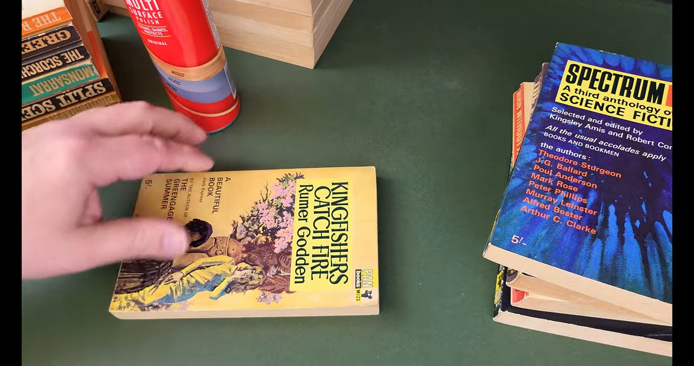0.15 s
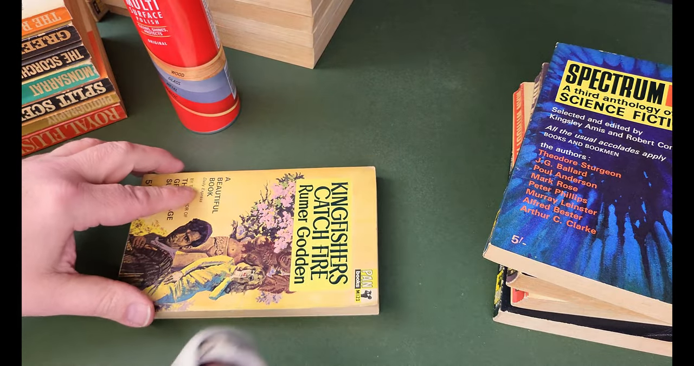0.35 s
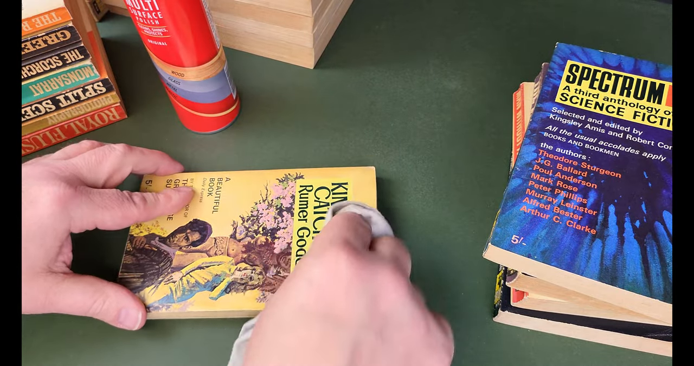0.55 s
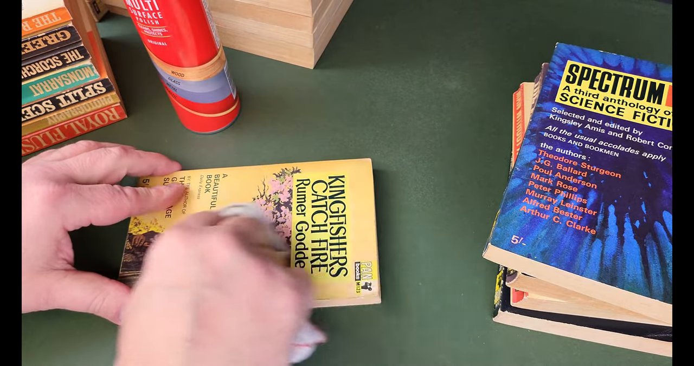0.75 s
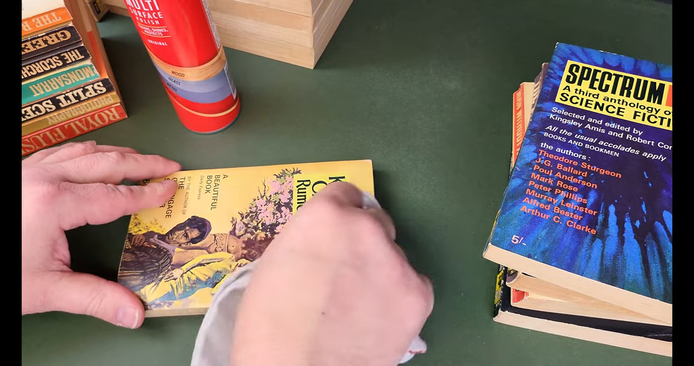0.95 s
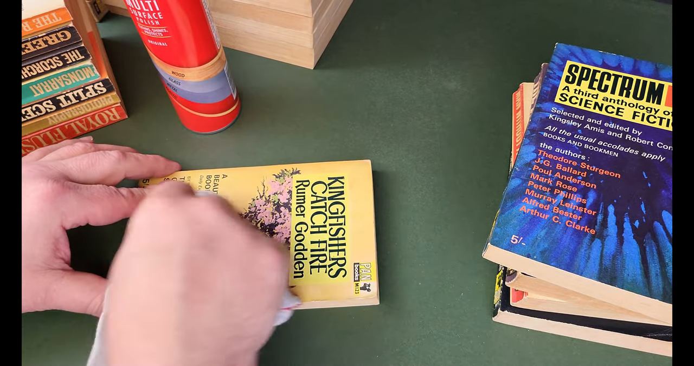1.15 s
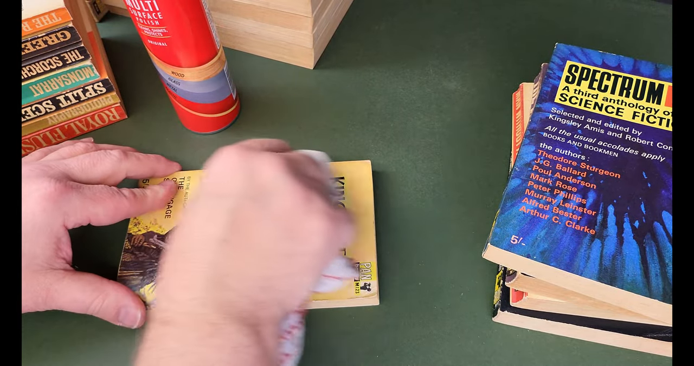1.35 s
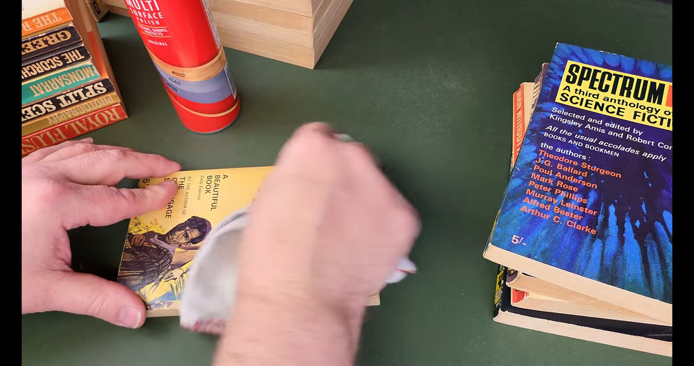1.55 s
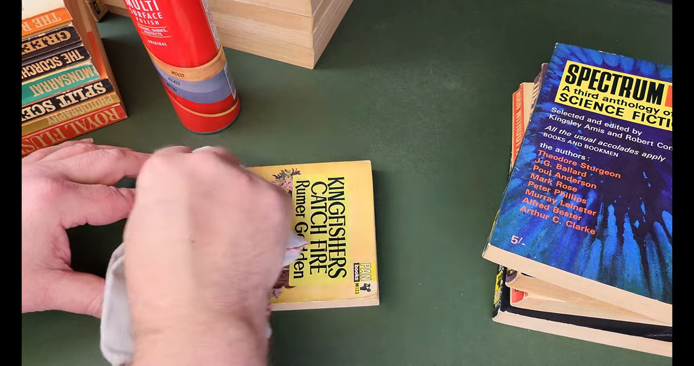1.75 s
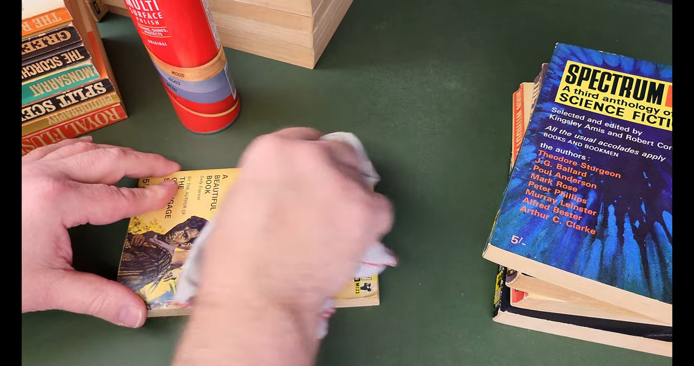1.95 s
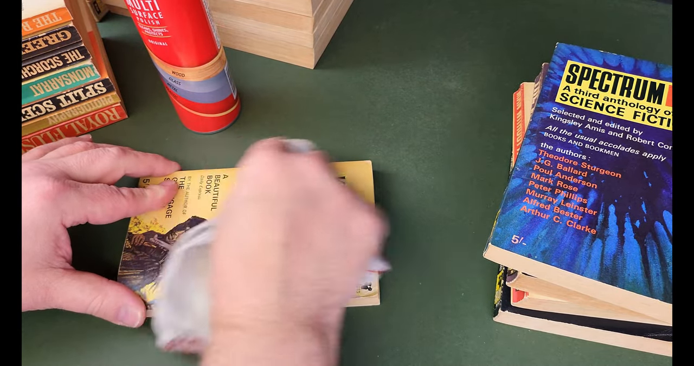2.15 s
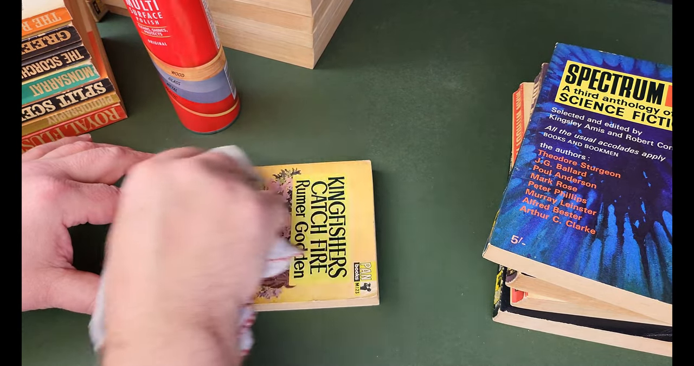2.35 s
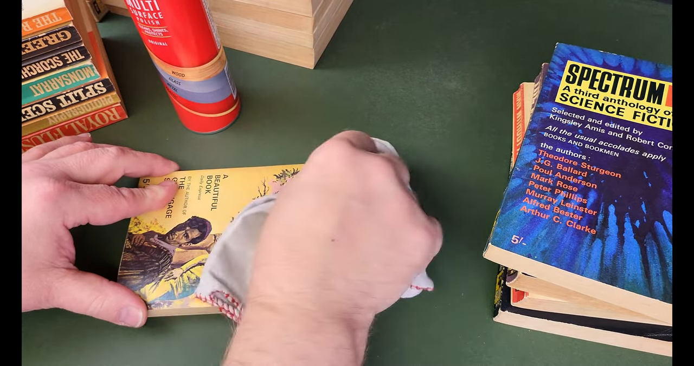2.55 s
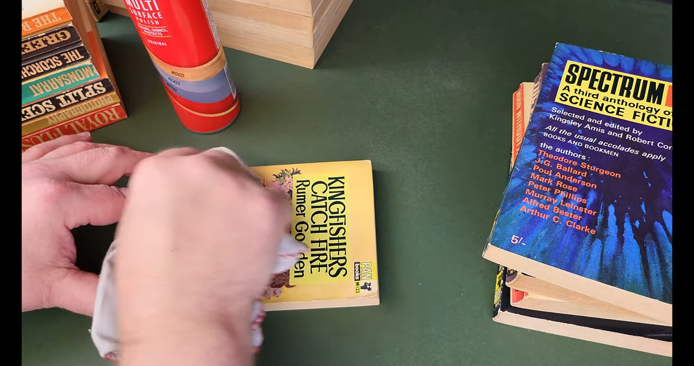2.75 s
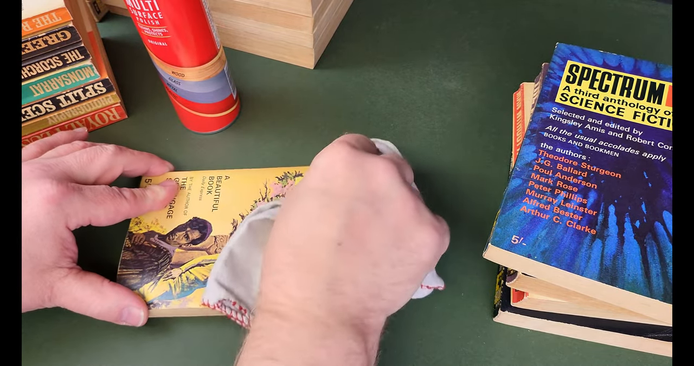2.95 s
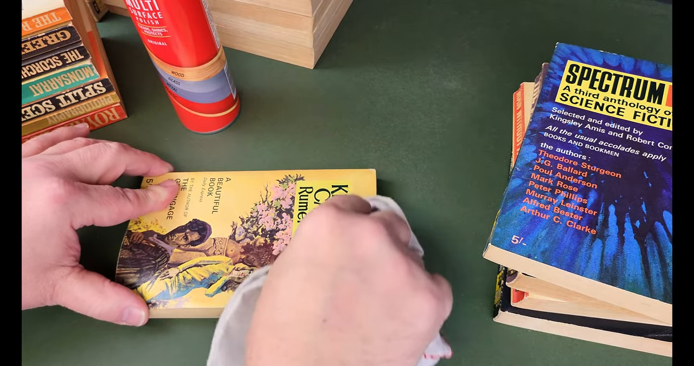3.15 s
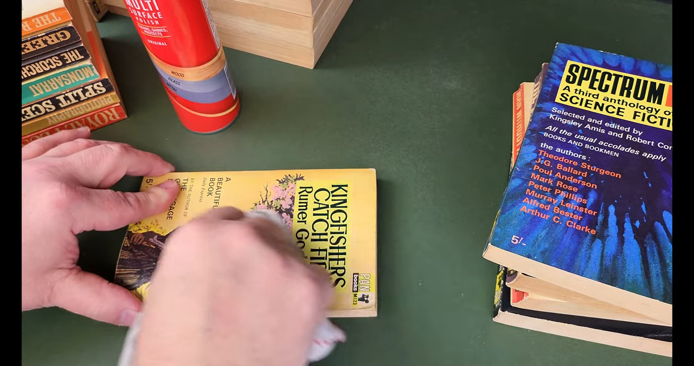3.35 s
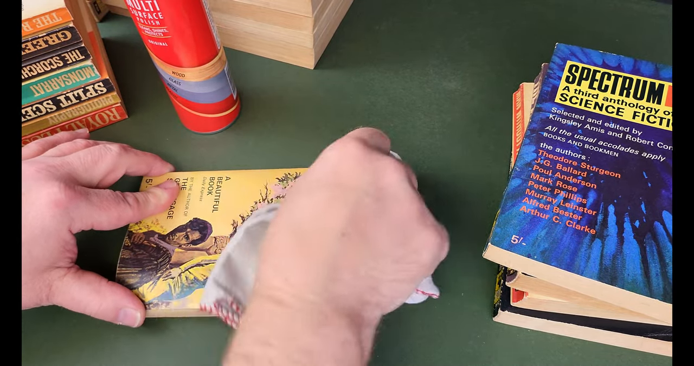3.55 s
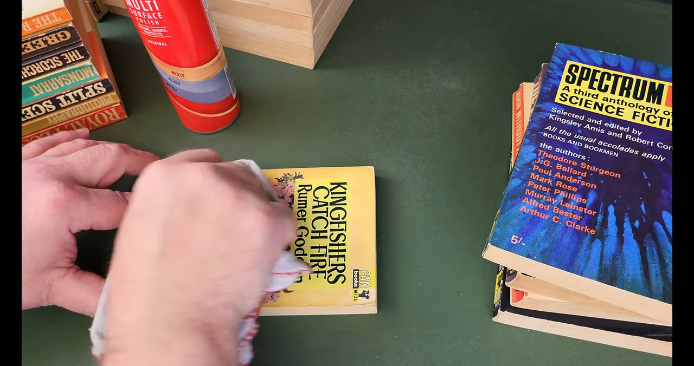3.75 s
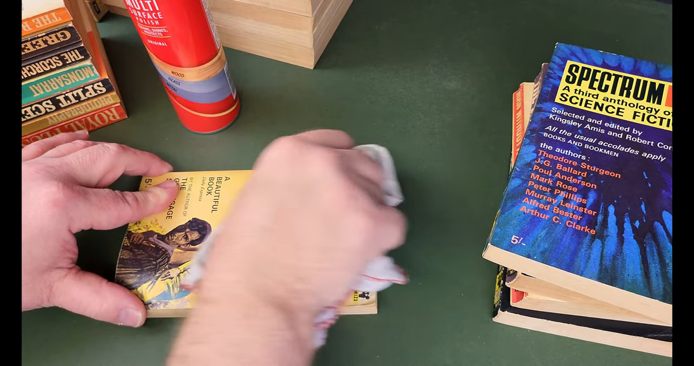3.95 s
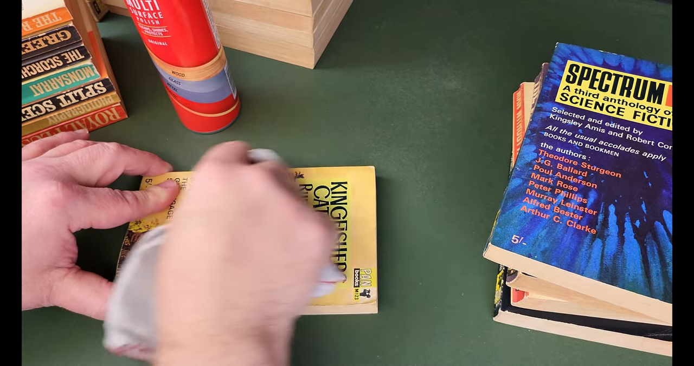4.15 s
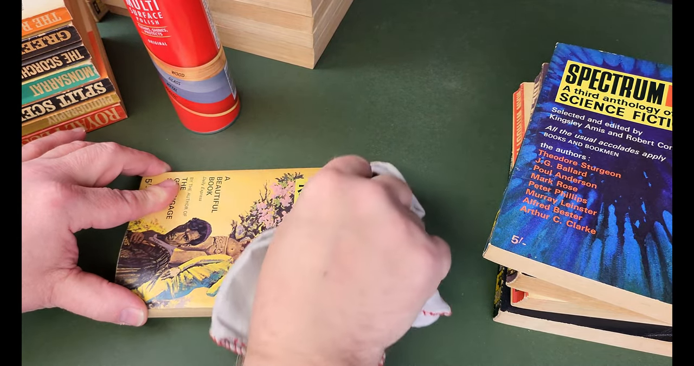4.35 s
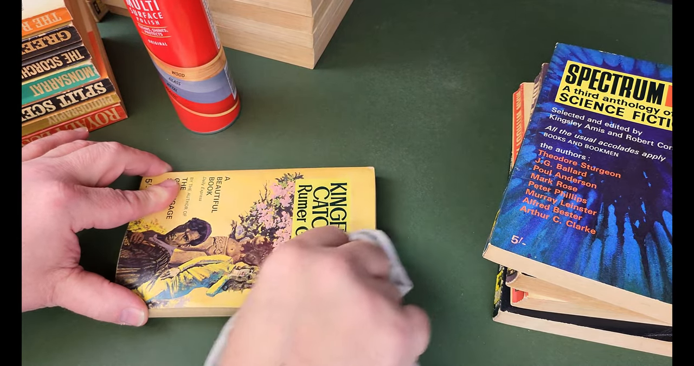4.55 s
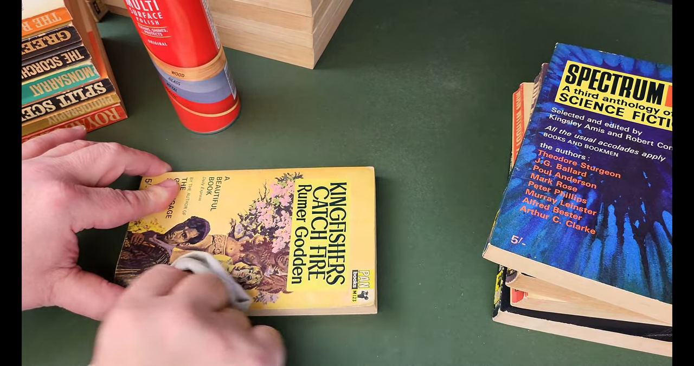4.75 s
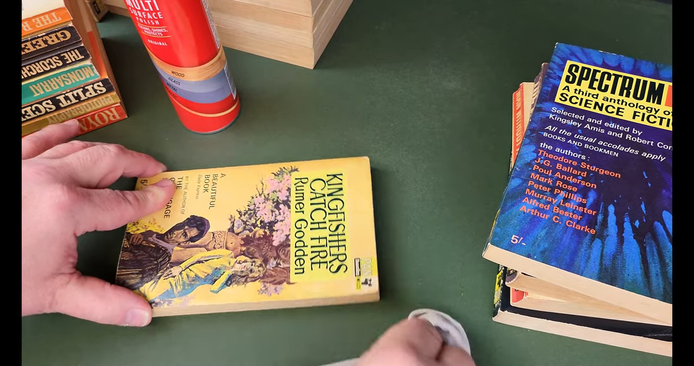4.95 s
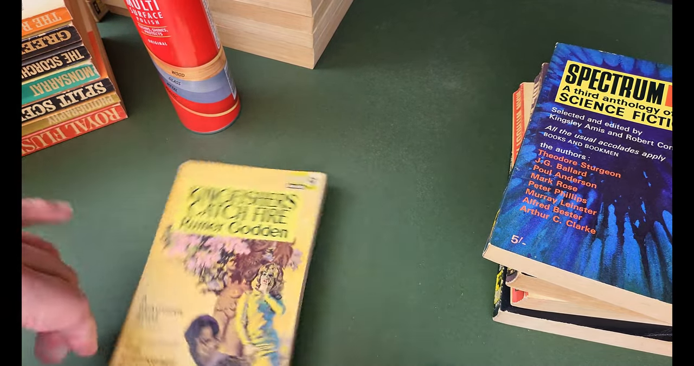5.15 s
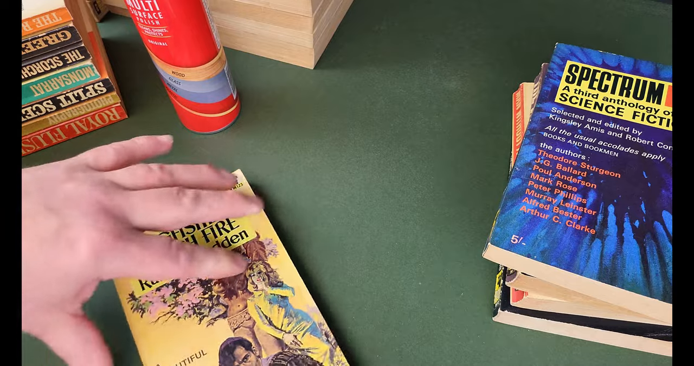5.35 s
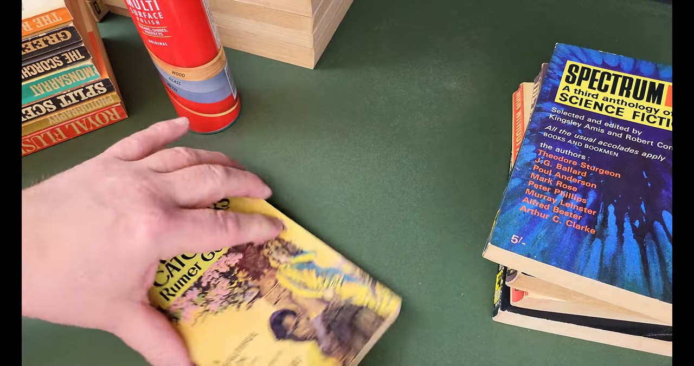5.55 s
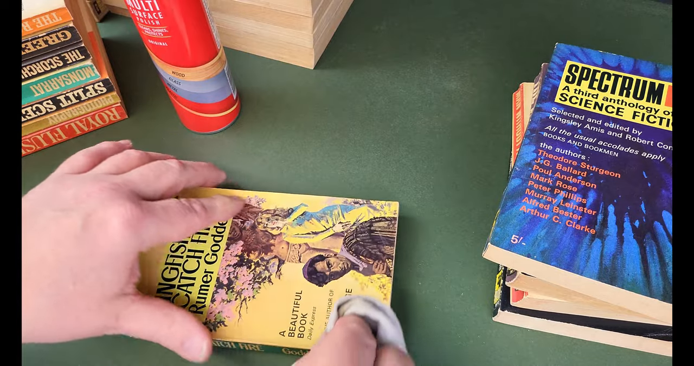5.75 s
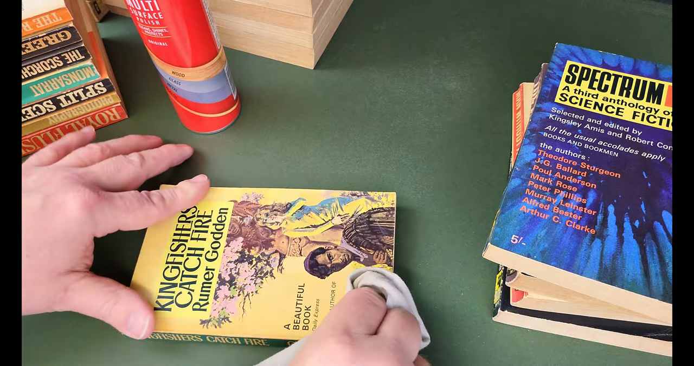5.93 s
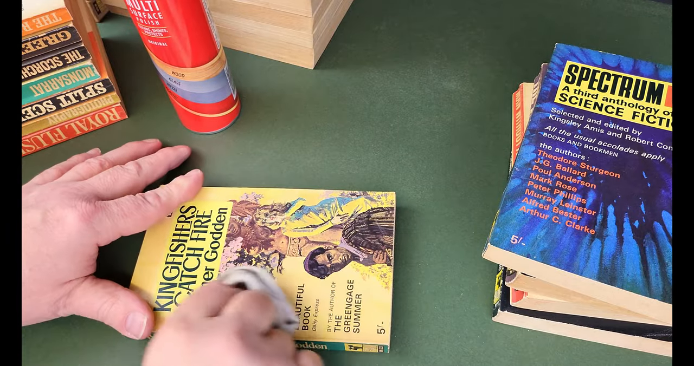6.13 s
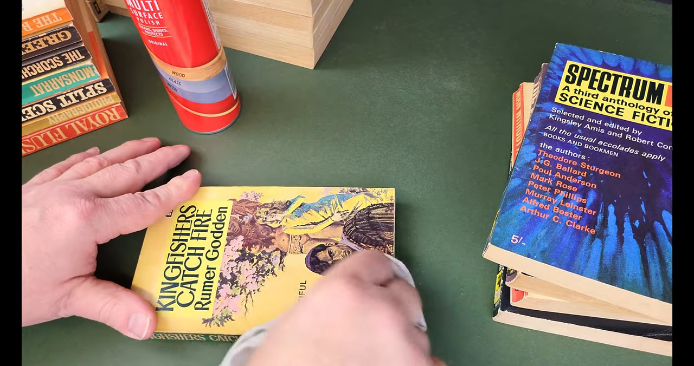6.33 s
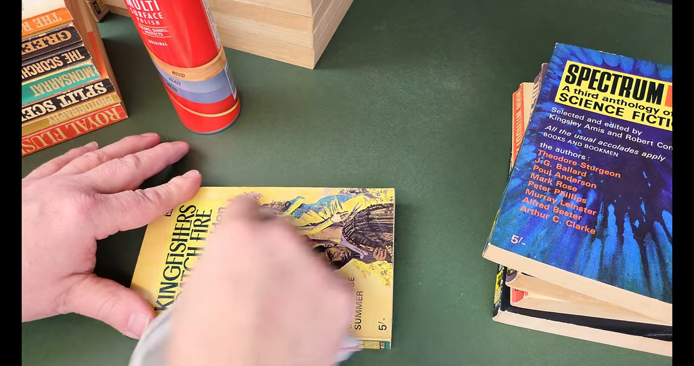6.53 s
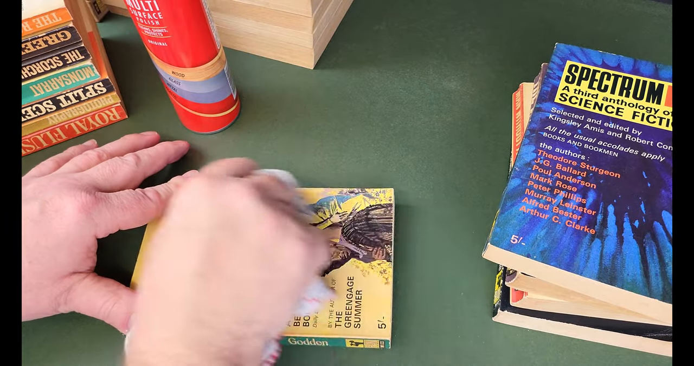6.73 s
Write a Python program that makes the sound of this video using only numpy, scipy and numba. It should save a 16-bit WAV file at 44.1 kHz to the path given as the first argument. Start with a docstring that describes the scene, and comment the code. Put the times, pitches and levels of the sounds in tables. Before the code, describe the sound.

A paperback drops onto a wooden table, then a cloth rubs its glossy cover in brisk, hissing strokes with a few handling knocks.

```python
"""Wiping down a paperback

A paperback drops flat on a wooden table, is held down and wiped with a cloth in brisk strokes, then
turned round and wiped again. Fibres slip over the glossy cover as a grainy hiss, the pressing hand
shakes the table, and knocks ring it. The microphone is close and overloads on the drop."""
import sys
import numpy as np
from scipy import signal
from scipy.fft import rfft, irfft
from scipy.io import wavfile
from scipy.ndimage import uniform_filter1d
from numba import njit

SR = 44100
rng = np.random.default_rng(int(sys.argv[2]) if len(sys.argv) > 2 else 0)


def master(y):
    """Save y as 16-bit WAV."""
    cut = np.clip(np.atleast_2d(y).T, -1, 1)
    pcm = np.round(cut * 32767)  # scale
    wavfile.write(sys.argv[1], SR, pcm.astype(np.int16))


N = 299439


def undb(db):
    """dB to gain."""
    return 10 ** (np.asarray(db) / 20)


def unit(x):
    """Scale to rms 1."""
    return x / np.sqrt(np.mean(x ** 2))


def wander(per_s):
    """Smooth random modulation: stepped levels, slewed twice."""
    hold = int(SR / per_s)
    steps = np.repeat(rng.standard_normal(N // hold + 1), hold)
    return unit(uniform_filter1d(uniform_filter1d(steps, hold), hold)[:N])


def band(x, hz, width):
    """Fixed band-pass around hz."""
    sos = signal.butter(2, [hz - width / 2, hz + width / 2], "band", fs=SR, output="sos")
    return signal.sosfilt(sos, x)


def ring(force, modes):
    """A force sets damped modes ringing; below 150 Hz they push little air."""
    out = np.zeros(N)
    for hz, db, t60 in modes:
        pole = np.exp(2j * np.pi * hz / SR - np.log(1000) / (t60 * SR))
        out += undb(db) * signal.lfilter([1], [1, -pole], force).imag
    return signal.lfilter(*signal.butter(2, 150, "high", fs=SR), out)


def slips(per_s, scatter_db):
    """Stick-slip: single jerks at random moments, a few much larger than the rest."""
    when, jerk, size = rng.random(N) < per_s / SR, rng.standard_normal(N), rng.exponential(size=N)
    return unit(when * jerk * undb(scatter_db * size))


def cue_grid(table):
    """A millisecond timeline, and the table's columns shaped to give one envelope per cue."""
    return np.arange(0, N / SR + .002, .001), np.transpose(table)[:, :, None]


def to_samples(t, envelope):
    """Smooth a millisecond envelope and bring it to audio rate."""
    return np.interp(np.arange(N) / SR, t, uniform_filter1d(envelope, size=5))


def fade_db(t, start, length, rise_db_per_s, fall_db_per_s):
    """Attenuation before and after a move; one that starts just after a knock has a hard attack."""
    since_knock = start - np.transpose(KNOCKS)[0]
    lands = ((since_knock > 0) & (since_knock < .014)).any(axis=1, keepdims=True)
    rise = np.where(lands, 3000, rise_db_per_s)
    return rise * np.maximum(start - t, 0) + fall_db_per_s * np.maximum(t - start - length, 0)


# EQ curve of the room tone: f/Hz, relative level/dB
ROOM_EQ = [(18, -31.5), (30, -9), (59, 0.5), (243, -2), (341, -7.5), (519, -7.5), (768, -17.5), (1560, -24),
           (3070, -29), (3990, -19), (5180, -18.5), (6560, -34), (15500, -33)]


def room():
    """A quiet bed of room tone that swells a little."""
    hz, db = np.transpose(ROOM_EQ)
    f = np.maximum(np.arange(N // 2 + 1) * SR / N, 1)
    eq = undb(np.interp(np.log(f), np.log(hz), db))
    tone = irfft(rfft(rng.standard_normal(N)) * eq, N)
    return unit(tone) * undb(-65.5 + 2.1 * wander(2.7))


# Fibres or grit catching on the table top: t/s, level/dB
TICKS = [(5.13, -21), (5.1476, -20), (5.1644, -26), (5.234, -21), (5.2554, -24), (5.2849, -15)]


def ticks():
    """Tiny bright catches as the book turns on the table."""
    force = np.zeros(N)
    for s, db in TICKS:
        force[int(s * SR)] = undb(db)
    return undb(4) * band(force, hz=5700, width=7400)


# Wooden body of the table with the book on it, also rung by the knocks: f/Hz, level/dB, t60/s
TABLE_MODES = [(45.2, -14.5, 0.067), (67, -14, 0.16), (96, -9, 0.11), (111, -10.5, 0.19), (129.4, -9, 0.22),
               (161, -16, 0.11), (199.6, -11.5, 0.14), (238.5, -1.5, 0.16), (277, -8.5, 0.09),
               (324, -3.5, 0.083), (354.3, 3.5, 0.087), (407.2, -3, 0.12), (450, -10, 0.12),
               (505, -0.5, 0.081), (559, -9.5, 0.057), (638, -14, 0.082), (689, -6.5, 0.062),
               (777, -9.5, 0.05), (940, -14.5, 0.064), (1160, -22, 0.055), (1483, -17.5, .05)]
# Shoves of the hand through the book: t/s, hold/s, low level/dB, upper level/dB, low fade/(dB/s)
SHOVES = [ (0.0, 0.0056, -63, -63, 348), (0.052, 0.0067, -64, -39, 258), (0.105, 0.12, -50.5, -54, 97),
          (0.131, 0.023, -55, -51, 202), (0.2, .04, -36, -36, 220), (0.46, 0.016, -67, -63.5, 500),
          (0.685, .02, -56, -56, 100), (0.885, 0.047, -60, -61.5, 150), (1.115, .01, -58.5, -70, 198),
          (1.215, 0.058, -48, -57.5, 166), (1.42, 0.017, -60, -69, 180), (1.59, 0.033, -56, -64, 199),
          (1.75, 0.12, -58, -60, 103), (1.89, 0.094, -56.5, -58.5, 146.5), (2.19, .075, -55, -61.5, 296),
          (2.33, 0.013, -55, -61, 250), (2.48, .04, -51.5, -64.5, 50), (2.55, 0.042, -51, -51, 220),
          (2.62, 0.06, -56, -51.5, 100), (2.71, 0.055, -48, -58, 77.5), (2.87, 0.049, -50, -55, 198.5),
          (2.98, 0.064, -54, -43.5, 78), (3.12, 0.063, -66, -52, 300), (3.34, 0.027, -66, -56.5, 302),
          (3.46, 0.032, -62.5, -63.5, 75), (3.555, .02, -56.5, -59, 115), (3.83, 0.084, -58.5, -65, 73),
          (4.19, 0.066, -52.5, -68, 180), (4.32, .01, -64.5, -49, 179), (4.39, 0.009, -52, -49, 180),
          (4.748, 0.018, -50, -36, 330), (4.876, .07, -58.5, -71, 100), (4.99, 0.023, -51, -55, 190),
          (5.07, 0.042, -62.5, -51.5, 300), (5.15, 0.11, -72, -55, 298), (5.33, .01, -68, -55, 300),
          (5.52, .01, -61, -60, 300), (5.62, .06, -70, -70, 60), (5.957, 0.034, -37.5, -51, 253),
          (6.04, 0.027, -57, -56.5, 198), (6.187, 0.039, -42, -45, 350), (6.285, .01, -47, -46.5, 108),
          (6.31, 0.0051, -34, -39.5, 219), (6.414, 0.02, -47.5, -56, 280), (6.588, .01, -56.5, -53, 102.5)]


def table_shake():
    """The book judders on the table: slow jerks ring the low modes, sharper ones the upper modes."""
    t, (start, hold, low_db, upper_db, fall) = cue_grid(SHOVES)
    rise = 505  # dB/s
    low_gain = undb(low_db - fade_db(t, start, hold, rise, fall)).max(axis=0)
    upper_gain = undb(upper_db - fade_db(t, start, hold, rise, 1.5 * fall)).max(axis=0)
    held = [(hz, db, 0.59 * t60) for hz, db, t60 in TABLE_MODES]  # pressing hands shorten the ring
    low_modes = [mode for mode in held if mode[0] < 200]
    upper_modes = [mode for mode in held if 200 < mode[0] < 1000]
    soft_jerks = signal.lfilter(*signal.butter(1, 110, fs=SR), slips(per_s=490, scatter_db=2.5))
    sharp_jerks = signal.lfilter(*signal.butter(1, 600, fs=SR), slips(per_s=1200, scatter_db=1.28))
    rumble = to_samples(t, low_gain) * unit(ring(soft_jerks, low_modes))
    judder = to_samples(t, upper_gain) * unit(ring(sharp_jerks, upper_modes))
    return rumble + judder


def add_push(force, s, db, contact_ms):
    """Add a smooth pulse of force: the longer the contact, the duller the hit."""
    progress = (np.arange(SR // 50) / SR - s % (1 / SR)) / (contact_ms / 1000)
    pulse = np.sin(np.pi * np.clip(progress, 0, 1)) ** 2
    i = int(s * SR)
    force[i:i + len(pulse)] += undb(db) * pulse / pulse.sum()


# The book's own short thud: f/Hz, level/dB, t60/s
BOOK_MODES = [(487, 0, 0.06), (765.5, 3, 0.014), (1310, -7, 0.015)]
# The drop (edge, flat of the cover, rebound): t/s, level/dB, contact/ms, slap send/dB, thud send/dB
DROP = [(0.1578, -10, 1.1, -32.5, -8.5), (0.1597, 3.5, 0.74, -14, -14), (0.1653, -14.5, 1.6, -34, -7.5)]
# Handling knocks: t/s, level/dB, contact/ms, slap send/dB, thud send/dB
KNOCKS = [(0.051, -52, 3.2, -30, 20), (0.352, -49.5, 2.8, -20, -23), (0.69, -39, 3.6, -24, -16),
          (0.881, -48, 2.5, -8.5, 2.5), (1.211, -36.5, 2.4, -18, -15), (1.266, -37, 3.2, -20, -10),
          (2.995, -39, 1.95, -21, 1), (3.052, -40, 2.6, -30, -16), (3.085, -45, 2.24, -13, -15),
          (4.31, -51, 2, -6, 7), (4.387, -49, 1.9, -15, 3), (4.744, -29, 2.8, -28, -12),
          (4.786, -50, 2, -13.5, -17), (4.866, -54, 2, -4, -18), (4.976, -37, 2.77, -7.5, -18),
          (5.49, -55, 2.25, -3, 6), (5.951, -40, 2.04, -8, -19), (5.959, -27, 6, -40, -30),
          (6.182, -34, 2.8, -22, -5), (6.192, -33, 2.6, -26, -0.5), (6.27, -37, 3.3, -23, -14),
          (6.294, -30, 1.8, -25, -24), (6.314, -27, 3.9, -23, -11), (6.412, -33, 3.4, -29, -6),
          (6.453, -44.5, 1.5, -17, -13), (6.576, -44.5, 1.35, -7, -8)]


def knocks():
    """Each hit has three layers: ringing table, thudding book and a paper slap with a short tail."""
    on_table, on_book, slap = np.zeros(N), np.zeros(N), np.zeros(N)
    t = np.arange(SR // 8) / SR
    slap_decay = np.exp(-t / 0.0019) + undb(-23) * np.exp(-t / 0.018)
    for s, db, contact_ms, slap_db, thud_db in DROP + KNOCKS:
        add_push(on_table, s, db, contact_ms)
        add_push(on_book, s, db + thud_db, contact_ms / 2)
        i = int(s * SR)
        slap[i:i + len(t)] += undb(db + slap_db) * slap_decay
    slap = uniform_filter1d(slap, size=24)  # the paper takes half a millisecond to flatten
    noise = rng.standard_normal(N)
    paper = sum(undb(db) * unit(band(noise, hz, width))
                for hz, width, db in [(1500, 1600, 0), (3600, 2300, -14), (7500, 5000, -30)])
    return undb(-8.5) * ring(on_table, TABLE_MODES) + ring(on_book, BOOK_MODES) + slap * paper


# Brisk wipes: t/s, length/s, end level/dB, swell/dB, sheen/dB, hollow/dB,
# hand cavity/dB, cavity change/dB, cavity f/Hz, cavity sweep/Hz
STROKES = [ (0.0, 0.11, -56.5, -4, -11.5, -19, -7.5, -19, 2660, 350),
           (0.71, 0.011, -59, 5.5, -29, -3, -4, -3, 3150, 100),
           (0.754, 0.12, -50, 10, -12.5, -4.5, -1.5, -1.5, 2900, -400),
           (0.965, .075, -60, 0.5, -14, -10, -5, 5, 2750, -100),
           (1.107, 0.093, -49, 9.5, -8, -10, -2, 5, 2320, -100),
           (1.285, 0.078, -54.5, 4, -10, -12, 0, -9, 2650, 100),
           (1.434, 0.083, -52.5, 1, -5.5, -16, -3, 6, 2820, 49.5),
           (1.6, 0.065, -53, 6, -11, -9, 0.5, -8, 2950, 50),
           (1.732, 0.096, -49, 5.5, -7.5, -11.5, -3, 8, 2880, -50),
           (1.892, .096, -53, 6.5, -13, -8, 1, -6, 2850, 200),
           (2.05, 0.098, -53.5, 0.5, -7.5, -14, -2.5, 10.5, 2770, -300),
           (2.204, .094, -51, 9, -12, -11, -1, -12.5, 2750, 200),
           (2.37, 0.1, -52, 1.5, -6.5, -19, -2, 9, 2780, -200),
           (2.535, 0.11, -49.5, 8, -12, -13.5, -0.5, -11, 2800, 200),
           (2.717, 0.096, -51.5, -1.5, -9.5, -28, -4.5, 7, 2850, -200),
           (2.885, 0.1, -50.5, 5, -13.5, -9.5, -4, -7.5, 2820, 98),
           (3.363, 0.1, -51.5, 3.5, -13.5, -10.5, -5.5, 5, 2370, -200),
           (3.502, 0.13, -54.5, 6.5, -11, -10, -4.5, -5, 2516, 550),
           (3.71, 0.1, -51.5, 3.5, -9, -17.5, -2, 8, 2610, 200),
           (3.9, 0.082, -50.5, 5.5, -14, -9, -4.5, -7, 2880, 150),
           (4.062, 0.11, -56, -5, -10, -16.5, -2.5, 15, 2800, 0),
           (4.238, 0.066, -49.5, 12.5, -16, -11.5, -0.5, -11, 2810, 250),
           (4.313, 0.023, -58, -6, -15, 15, -6, 0, 2800, 0),
           (4.646, .156, -46.5, 8.5, -12, -9.5, -4.5, 2.5, 3120, -300),
           (4.869, 0.11, -50, 4, -22, -11, -3, 3, 3120, 300),
           (5.955, 0.037, -50, 9, -13, -11.5, -4, -5.5, 2870, 0),
           (6.115, 0.12, -46, 9, -17, -6.5, -4, -9, 3130, -150),
           (6.325, 0.071, -58.5, -3.5, -22, -5, -3, 1, 3250, 200),
           (6.47, 0.087, -49.5, 2, -14.5, -6, -5.5, 8, 2770, -400),
           (6.615, 0.09, -54, 2, -14, -9.5, -2.5, -3, 2740, 200),
           (6.775, 0.046, -48.5, 4.5, -13.5, -14, -6.5, 0, 2550, -100)]
# Slow slide of creeping cloth and turning book:
# t/s, level/dB, sheen/dB, hollow/dB, hand cavity/dB, cavity f/Hz
SLIDE = [(0.0, -67, -2, -1, -16, 2931), (0.145, -64, -9, -17, -10, 2920),
         (0.251, -95, -6, -5.5, -11.5, 2900), (0.4, -75.5, -22, -18.5, -18.5, 2900),
         (0.48, -74, -25, -15.5, -18, 2900), (0.639, -94.5, -2, -11, -6.5, 2900),
         (0.74, -72.5, -12, 0, -2, 2920), (1.5, -72, -10, -2, 0, 2776),
         (2.3, -68.5, -15.5, -0.5, -5.5, 2850), (2.6, -60, -15, -19, -10.5, 2850),
         (2.85, -69, -16, -17, -6, 2800), (3.035, -59.5, -15, 0, 2.5, 2770),
         (3.131, -60, -17, -14.5, -14, 2680), (3.29, -57.5, -17, -12.5, -10, 3380),
         (3.33, -63.5, -25, -5, -11, 3000), (3.671, -72, -6, -3, -2, 2640), (4.2, -69, -11, -4, -1, 2670),
         (4.34, -54.5, -9, -3.5, -4, 2932), (4.42, -60, -20, -9, -6, 2630),
         (4.5, -56.5, -9, -12.5, -18, 2560), (4.62, -57.5, -22, -9, -7, 3280),
         (4.84, -67, -11, -5, -2.5, 2990), (5.0, -62, -15, -2, -8, 3200), (5.05, -60.5, -27, -9, -4, 3190),
         (5.1, -41.5, -6, -31, -6, 2960), (5.145, -36.5, -0.5, -26, -5.5, 2650),
         (5.21, -42.5, -0.5, -9, -9.5, 2680), (5.245, -37.5, -1, -13, -7, 2650),
         (5.29, -39.5, -4, -18.5, -13, 2780), (5.368, -50.5, -9.5, -10.5, -6.5, 3080),
         (5.422, -68.5, -13, -6, -4, 3050), (5.482, -84, -1, -1, -2, 3100), (5.493, -65.5, -5, 8, -1, 3120),
         (5.524, -51.5, -24, -13, -4, 3057), (5.6, -47, -5.5, -5, -2.5, 2780),
         (5.74, -54, -5.5, -7.5, -1, 2850), (5.795, -68.5, -12, -1, 1.5, 2920),
         (5.87, -85, -3.5, -15, -5, 2900), (5.942, -87, 11, -3, -2.5, 2900),
         (5.97, -62.5, -14, -8.5, -2.5, 2970), (6.79, -68, -13, -5, 0, 2930)]


def hand_moves():
    """Level and tone curves of the rubbing: the loudest move of the moment leads the tone."""
    t, (start, length, db, swell_db, *tone) = cue_grid(STROKES)
    sheen_db, hollow_db, cavity_db, change_db, cavity_hz, sweep_hz = tone
    progress = np.clip((t - start) / length, 0, 1)
    # the cloth gets under way, then stops dead as the hand turns back
    fades = fade_db(t, start, length, rise_db_per_s=526, fall_db_per_s=993)
    strokes = [db - swell_db * (1 - progress) - fades,
               sheen_db + 6 * np.sin(np.pi * progress),  # brightest mid-stroke, where the hand is fastest
               np.broadcast_to(hollow_db, progress.shape),
               cavity_db + change_db * (progress - .5),
               cavity_hz + sweep_hz * (progress - .5)]
    slide_t, *slide = np.transpose(SLIDE)
    level_db, *colours = [np.vstack([brisk, np.interp(t, slide_t, slow)])
                          for brisk, slow in zip(strokes, slide)]
    power = undb(2 * level_db)
    total = power.sum(axis=0)
    blend = [(power / total * colour).sum(axis=0) for colour in colours]
    return [to_samples(t, curve) for curve in [10 * np.log10(total)] + blend]


@njit
def swept_band(x, hz, width):
    """State-variable band-pass whose centre moves."""
    y, band_state, low_state = np.empty(len(x)), 0., 0.
    for i in range(len(x)):
        g, damping = np.tan(np.pi * hz[i] / SR), width / hz[i]
        passed = (band_state + g * (x[i] - low_state)) / (1 + g * (g + damping))
        band_state = 2 * passed - band_state
        low_state += 2 * g * passed
        y[i] = damping * passed
    return y


def cupped(force, hz, width):
    """A steep, moving resonance of the cupped hand, fed by its own patch of cloth."""
    patch = np.roll(force, rng.integers(N))
    return unit(swept_band(swept_band(patch, hz, width), hz, width))


def resonances(force, bands):
    """Fixed bands, each fed by its own patch of cloth and flickering as the folds shift."""
    out = np.zeros(N)
    for hz, width, db in bands:
        gain = undb(db + 1.1 * wander(14))
        patch = np.roll(force, rng.integers(N))
        out += gain * unit(band(patch, hz, width))
    return unit(out)


# Body of the hiss, the cover under the cloth: f/Hz, width/Hz, level/dB
COVER = [(1300, 2400, -10.5), (4027, 1200, -2), (5240, 870, -1), (6540, 1000, -1.5), (8000, 870, -7)]
# Glossy top end of the hiss: f/Hz, width/Hz, level/dB
SHEEN = [(8640, 3100, 6), (11250, 1200, -7.5), (13500, 3400, -14)]
# Hollow note of the cupped hand: t/s, f/Hz
HOLLOW = [(0.0, 990), (0.15, 1005), (0.749, 1443), (2.9, 1450), (3.05, 1290), (3.4, 1550), (4.0, 1454),
          (4.35, 1300), (4.68, 1600), (4.75, 1150), (4.95, 1545), (5.27, 1290), (5.4, 1610), (5.5, 1210),
          (5.66, 1222), (5.75, 1430), (6.79, 1508)]
# Overtones of the hand cavity: frequency ratio, level/dB
CAVITY_OVERTONES = [(2.099, -12.5), (3.099, -18)]


def cloth():
    """Dense fibre slips make a grainy hiss, coloured by the cover and the cupped hand."""
    hiss_db, sheen_db, hollow_db, cavity_db, cavity_hz = hand_moves()
    hollow_hz = np.interp(np.arange(N) / SR, *np.transpose(HOLLOW))
    fibres = slips(per_s=12000, scatter_db=-1.0)
    cavity = cupped(fibres, cavity_hz, width=1000.)
    for ratio, db in CAVITY_OVERTONES:
        cavity += undb(db) * cupped(fibres, ratio * cavity_hz, width=1000.)
    hiss = resonances(fibres, COVER) + undb(sheen_db) * resonances(fibres, SHEEN)
    hiss += undb(hollow_db) * cupped(fibres, hollow_hz, width=590.) + undb(cavity_db) * cavity
    tremble_db = 0.27 * wander(110)  # the weave grips unevenly
    return undb(hiss_db + tremble_db) * hiss


def scene():
    """All layers mixed in mono at one close microphone."""
    return (cloth() + table_shake() + knocks() + ticks() + room())[None]


def record(dry):
    """The microphone sheds the deepest bass, the converter clips at full scale and the top is cut."""
    thin = signal.lfilter(*signal.butter(3, 42, "high", fs=SR), dry)
    top_cut = signal.ellip(10, .2, 70, 15690, fs=SR, output="sos")
    return signal.sosfilt(top_cut, np.clip(thin, -1, 1))


dry = scene()
out = record(dry)
master(out)
```